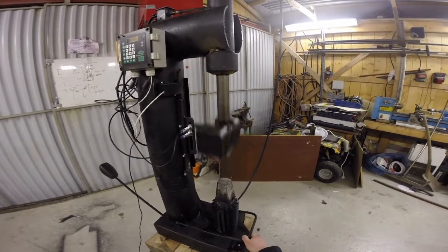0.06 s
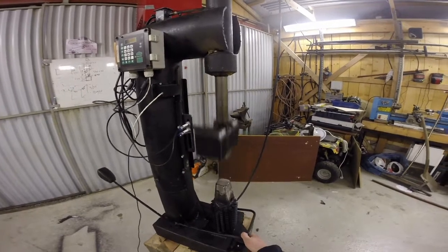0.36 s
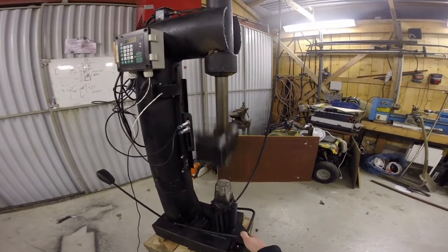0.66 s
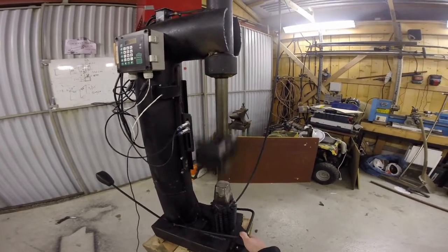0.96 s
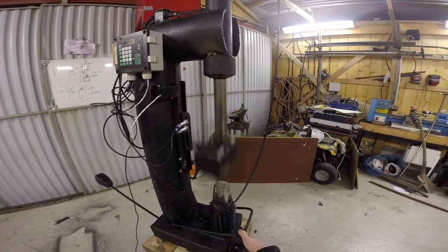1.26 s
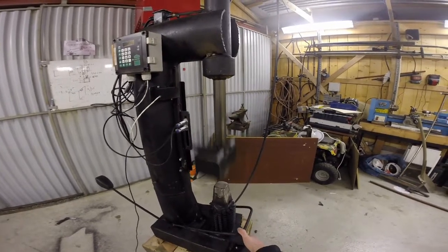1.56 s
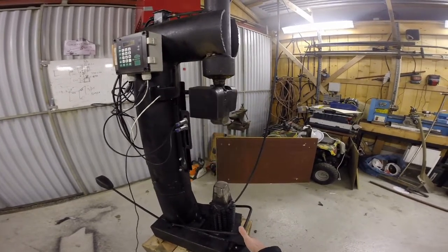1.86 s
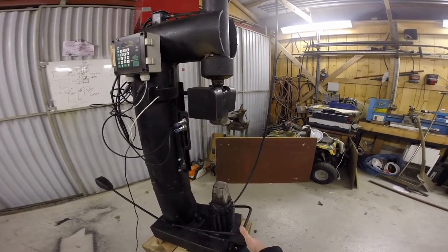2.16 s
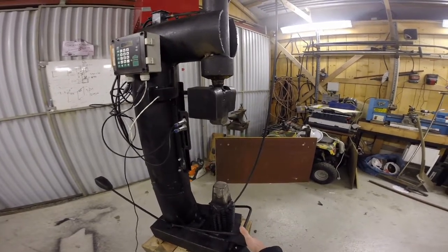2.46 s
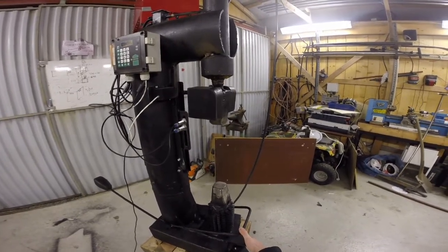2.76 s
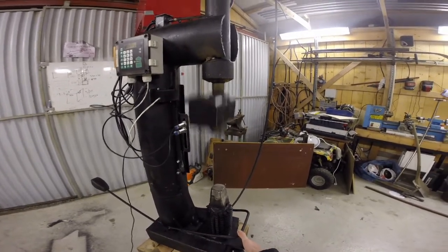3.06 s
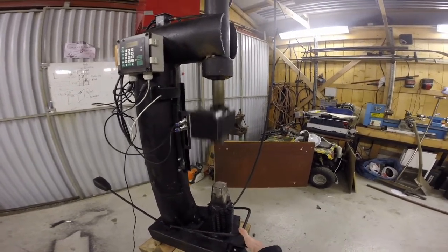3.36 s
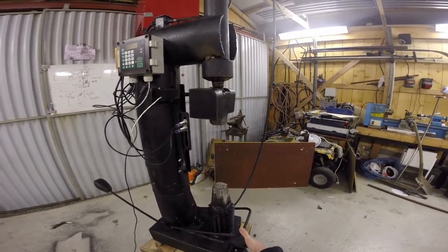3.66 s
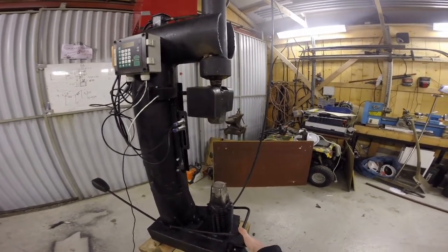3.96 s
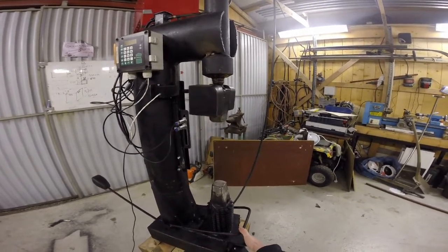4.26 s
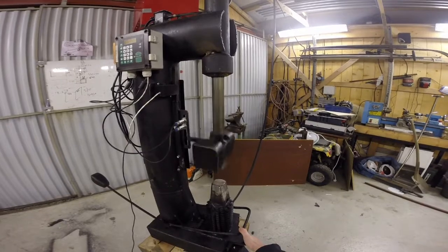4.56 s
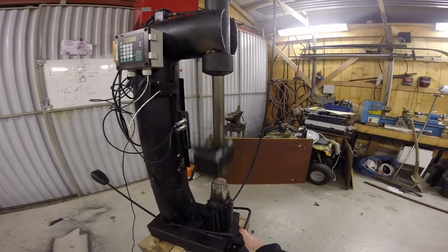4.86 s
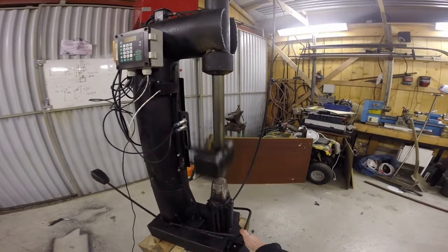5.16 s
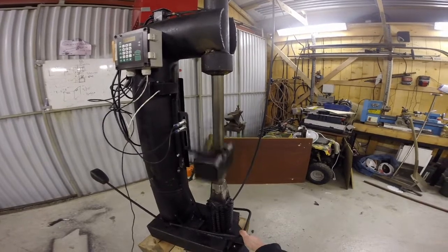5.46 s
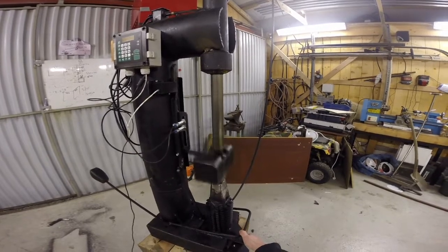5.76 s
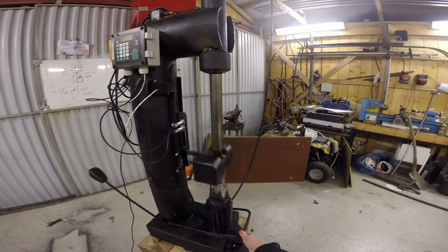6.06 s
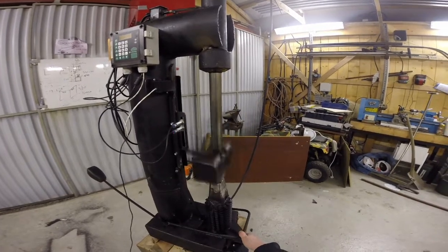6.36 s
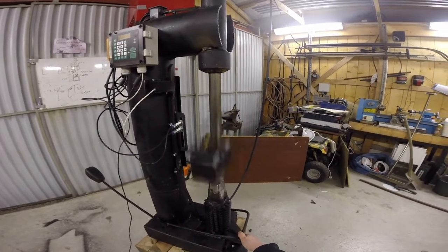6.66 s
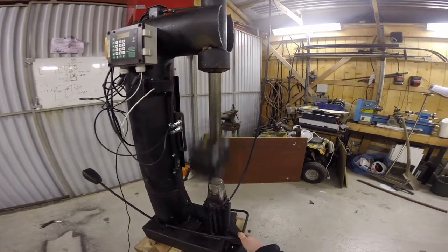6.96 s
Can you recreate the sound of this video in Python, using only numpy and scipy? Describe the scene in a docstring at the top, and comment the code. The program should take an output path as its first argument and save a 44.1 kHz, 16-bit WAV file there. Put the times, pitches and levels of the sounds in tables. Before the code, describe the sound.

Close up in a workshop, an air-powered hammer strikes its anvil twice and keeps cycling with rhythmic blasts of compressed air. It stops with a metal clack and a bleeding hose, makes a single stroke, and stops again, leaving a thin valve whistle and faint ticking from a far pump. It then restarts with a clunk, hissing steadily in pulses, and finishes with sharp steel-on-steel hits.

```python
"""A metal-clad workshop, one microphone on a home-built pneumatic hammer, about three strokes a second.
Exhaust air hisses on every stroke; the ram turns on an air cushion, strikes the anvil or parks against
its top stop, where the hose bleeds and the valve whistles. From across the shop a pump ticks faintly.
The gain control behind the microphone ducks at each blow and swells in the pauses."""
import sys
import numpy as np
from scipy import signal
from scipy.fft import rfft, irfft
from scipy.io import wavfile
from scipy.ndimage import uniform_filter1d, minimum_filter1d

SR = 44100
rng = np.random.default_rng(int(sys.argv[2]) if len(sys.argv) > 2 else 0)


def materialize(psi):
    """Save the field psi as 16-bit PCM at rate SR to the path in sys.argv[1].

    A 1-D psi becomes a single channel; in a 2-D psi each row is a channel.
    """
    bounded = np.clip(np.atleast_2d(psi).T, -1, 1)
    quanta = np.round(bounded * 32767).astype(np.int16)
    wavfile.write(sys.argv[1], SR, quanta)


N = 317961
TIME = np.arange(N) / SR

# Ram on anvil, then ram on top stop. Each row: time in seconds, relative level in dB, extra ring in dB.
ANVIL_BLOWS = [(-.02, 13.5, -6), (0.2946, 17, -9.5), (6.154, -2, -10), (6.157, -3.5, 6.5), (6.169, -3, -1),
               (6.174, -2.5, -18), (6.4551, 18.5, -12), (6.7677, 18, -9), (7.0821, 15, -6)]
TOP_STOPS = [(1.902, 12.5, -3.5), (3.5644, 13.5, -4)]
# The ram turns on its air cushion. Each row: time in seconds, relative level in dB.
RAM_REVERSALS = [(0.81, -25), (1.126, -26.5), (1.447, -24.5), (4.765, -30), (5.067, -29), (5.372, -27.5),
                 (5.684, -28), (5.992, -29), (6.157, -19.5), (6.305, -27)]
# Low shudders of the frame. Each row: start in seconds, relative level in dB.
FRAME_SHUDDERS = [(.65, -29), (1.02, -32), (1.29, -37), (5.2, -36), (5.56, -33.5)]
# The valve launches the parked ram. Each row: start in seconds, relative level in dB, t60 in seconds.
LAUNCHES = [(3.078, -12.5, 0.094), (4.418, -18, 0.1)]
# The valve switches and vents a stroke. Each row: time in seconds, relative flow in dB,
# swell beforehand in seconds, hold in seconds, extra treble in dB.
VALVE_STROKES = [(0.193, -19, 0.06, .11, -4), (0.524, -15.5, 0.067, 0.09, -4),
                 (0.809, -11, 0.17, 0.079, -3.5), (1.129, -12.5, 0.19, 0.093, -4),
                 (1.455, -12.5, .16, 0.1, -4), (1.764, -10.5, .12, 0.11, -8),
                 (3.081, -10, 0.0017, .16, -1.5), (3.429, -14, 0.12, 0.15, 0),
                 (4.425, -10, 0.0023, 0.16, -1.5), (4.773, -13, 0.11, .09, -3),
                 (5.075, -13.5, 0.26, 0.091, -2), (5.379, -13, 0.14, 0.11, -3.5),
                 (5.68, -12.5, 0.15, 0.12, -3), (6.011, -11.5, 0.15, 0.092, -4),
                 (6.337, -7.5, 0.1, 0.07, -3.5), (6.661, -13.5, 0.084, 0.081, -1),
                 (6.968, -11.5, 0.082, 0.086, 0), (7.24, -17.5, 0.11, .1, 2)]
# The valve shuts as the ram ends its travel. Each entry: time in seconds.
VALVE_SHUTS_S = [0.298, 1.902, 3.56, 6.437, 6.772, 7.085]
# Whistles of the valve. Each row: end of the swell in seconds, relative level in dB, length in seconds.
VALVE_WHISTLES = [(2.25, -41.5, .42), (3.87, -39.5, .53)]
# Runs of the pump. Each row: start, end and period in seconds, relative level in dB,
# sag in dB per second, after-click in dB against its tick.
DISTANT_PUMP_RUNS = [(2.558, 3.03, .1053, -29, 12, -6), (3.872, 4.36, .1088, -25, 17, -18)]

# Ringing metal. Each row: frequency in Hz, relative level in dB, t60 (time to fall 60 dB) in seconds.
DIE_AND_FRAME_MODES = [(685, -8.5, 0.014), (938, -5.5, 0.014), (1345, -3, 0.0077), (1794, -4.5, 0.0097),
                       (2290, -8.5, 0.0072), (3100, -27, 0.0045), (4480, -17, 0.019), (888, -30, .4),
                       (895, -30, .4), (1253, -32, 0.51), (1262, -40, 0.3), (1710, -32, 0.34),
                       (1850, -35, 0.69), (2008, -34, 0.31), (2320, -36, .55), (2520, -35, 0.37),
                       (4400, -42, 0.28)]
TOP_STOP_MODES = [(396, -19.5, 0.011), (690, -14, 0.0093), (998, -8, 0.012), (1580, -0.5, 0.011),
                  (2270, -3, 0.0049), (2970, -8, 0.0085), (3530, -5, 0.0049), (1225, -76, .35),
                  (2380, -46, .6), (2395, -42.5, 0.87)]
CASING_MODES = [(860, -10, 0.031), (1003, -7.5, 0.034), (1240, -8, 0.04)]
VALVE_BODY_MODES = [(141, -10.5, 0.11), (332, -3, 0.086), (560, -4, 0.081)]
# Steady narrow peaks that colour the exhaust hiss, then resonances of the bleeding hose.
# Each row: frequency in Hz, width in Hz, gain in dB.
HISS_PEAKS = [(1884, 46, -22), (2500, 16, -20), (2750, 17, -11), (3370, 63, -5.5), (3570, 14, 1.5),
              (3700, 16, -10), (3800, 41, -21), (4220, 45, -7), (5208, 45, -5), (5680, 170, -12),
              (7090, 72, -5.5), (7580, 120, -5.5)]
HOSE_RESONANCES = [(1270, 53, -3), (1700, 79, -37), (2420, 26, -7), (2920, 160, -2), (3400, 40, 7),
                   (4040, 40, 4), (8500, 200, -6)]
# Noise spectra of the sources. Each row: frequency in Hz, relative spectral density in dB.
THUMP_SPECTRUM = [(30, -23), (90, -6), (140, -10.5), (180, -4.5), (250, -9), (450, -2), (900, -28)]
SHUDDER_SPECTRUM = [(25, -7), (55, -9), (90, -1), (130, -7), (250, -42)]
FEED_SPECTRUM = [(15, -35), (25, 2), (156, -5), (219, -5), (249, -16.5), (283, -4.5), (440, -5.5),
                 (839, -3.5), (979, -2), (1140, -7), (1240, -2.5), (2130, -4), (3050, -4), (8580, -31),
                 (12000, -55), (15600, -91), (22000, -120)]
PUFF_SPECTRUM = [(30, -1), (80, -24), (140, 2), (220, -3.5), (340, -3), (560, 7), (900, -7), (2000, -18)]
SHOP_SPECTRUM = [(15, -26), (25, 0.5), (281, -3), (389, -8), (631, -0.5), (919, -3), (1140, 0), (1380, -4),
                 (1660, -1), (2560, -3), (2920, -7.5), (3930, -7.5), (6550, -20), (15500, -36.5)]
EXHAUST_SPECTRUM = [(150, -53), (250, -23), (330, -25), (405, -25), (466, -17), (837, -14.5), (1290, -8.5),
                    (1480, -9), (1790, -5), (4320, 0), (9070, -10), (14700, -29), (15500, -39)]
TICK_SPECTRUM = [(400, -14), (750, -5), (1000, 4), (1250, -3), (1550, -13), (2000, -1), (2800, -29),
                 (6000, -62)]


def from_db(db):
    """Decibels to gain."""
    return 10 ** (np.asarray(db) / 20)


def rms_one(x):
    """Scale to rms 1."""
    return x / np.sqrt(np.mean(x ** 2) + 1e-20)


def since(s):
    """Seconds gone by since time s; zero before it."""
    return np.maximum(TIME - s, 0)


def until(s):
    """Seconds left until time s; zero after it."""
    return np.maximum(s - TIME, 0)


def butter(x, hz, kind):
    """Second-order low- or high-pass filter."""
    return signal.sosfilt(signal.butter(2, hz, kind, fs=SR, output="sos"), x)


def noise(spectrum):
    """Noise of rms 1 with the given spectrum, falling 20 dB an octave beyond its ends."""
    hz, db = np.transpose(spectrum)
    bins = np.maximum(np.fft.rfftfreq(2 * N, 1 / SR), 1)
    octaves_beyond = np.abs(np.log2(bins / np.clip(bins, hz[0], hz[-1])))
    gain = from_db(np.interp(np.log(bins), np.log(hz), db) - 20 * octaves_beyond)
    return rms_one(irfft(rfft(rng.standard_normal(2 * N)) * gain)[:N])


def flutter(hz):
    """Random wavering up to the given rate; rms 1."""
    return rms_one(butter(rng.standard_normal(N + SR), hz, "low")[SR:])


def with_peaks(x, peaks):
    """Add narrow spectral peaks to a noise; rms 1."""
    out = x.copy()
    for hz, width_hz, db in peaks:
        radius = np.exp(-np.pi * width_hz / SR)
        forward = np.array([1, 0, -1]) * (1 - radius ** 2) / 2
        feedback = [1, -2 * radius * np.cos(2 * np.pi * hz / SR), radius ** 2]
        out += from_db(db) * signal.lfilter(forward, feedback, x)
    return rms_one(out)


def dying(t60, attack_s):
    """Envelope that rises softly and falls 60 dB in t60 seconds."""
    return (1 - np.exp(-TIME / attack_s)) ** 2 * np.exp(-np.minimum(np.log(1000) * TIME / t60, 50))


def ring(hz, db, t60, attack_s):
    """One mode of a knocked part: a dying sine."""
    return from_db(db) * np.sin(2 * np.pi * hz * TIME) * dying(t60, attack_s)


def add(out, s, sound):
    """Mix a sound in from time s on."""
    at = round(s * SR)
    part = sound[max(-at, 0):N - at]
    out[max(at, 0):max(at, 0) + len(part)] += part


def repeat(sound, events):
    """Place a sound or envelope at each event, given as time in seconds and level in dB."""
    out = np.zeros(N)
    for s, db, *_ in events:
        add(out, s, from_db(db) * sound)
    return out


def strikes(blows, modes, contact_s, low_cut_hz, crack_db=-2, crack_t60=0.012):
    """Steel on steel: each blow rings every mode with a strength of its own, and the faces crack."""
    out = np.zeros(N)
    rings = np.array([(-1) ** k * ring(*mode, contact_s) for k, mode in enumerate(modes)])
    lasting = np.array([t60 > 0.1 for hz, db, t60 in modes])
    crack = from_db(crack_db) * dying(crack_t60, contact_s) * butter(rng.standard_normal(N), 3100, "low")
    for s, db, ring_db in blows:
        strengths = from_db(rng.standard_normal(len(modes)) + ring_db * lasting)
        add(out, s, from_db(db) * (strengths @ rings + crack))
    return butter(out, low_cut_hz, "high")   # compact steel parts radiate little bass


def anvil():
    """The dies meet in a dead clack; the frame rings on, its close modes beating."""
    return strikes(ANVIL_BLOWS, DIE_AND_FRAME_MODES, contact_s=0.00038, low_cut_hz=465)


def frame(jolt_db=-42, attack_s=0.0034):
    """The column is jolted by each blow, thumps softly at each reversal and shudders as the ram runs."""
    jolts = [(s, db + jolt_db) for s, db, _ in [*ANVIL_BLOWS, *TOP_STOPS]]
    thumps = repeat(dying(0.13, attack_s), [*RAM_REVERSALS, *jolts]) * noise(THUMP_SPECTRUM)
    bending = repeat(ring(hz=140, db=2.5, t60=0.093, attack_s=attack_s), RAM_REVERSALS)   # lowest mode
    shudders = repeat(dying(t60=0.4, attack_s=0.016), FRAME_SHUDDERS) * noise(SHUDDER_SPECTRUM)
    return thumps + bending + shudders


def after_blow_rush(level_db=-20.5, fall_db_per_s=32.5):
    """A dull rush lingers and fades after each full blow, none after grazes."""
    fades = [(TIME >= s) * from_db(level_db - fall_db_per_s * since(s))
             for s, db, _ in ANVIL_BLOWS if db > 0]
    return np.max(fades, axis=0) * butter(noise(FEED_SPECTRUM), 80, "high")


def cylinder(feed_db=-38, chuff_delay_s=0.104, chuff_db=-27):
    """Feed air and the after-blow rush sound while the ram runs; a low puff marks each launch."""
    starts = [0] + [s for s, *_ in LAUNCHES]
    ends = [s for s, *_ in TOP_STOPS] + [N / SR]
    running = sum((TIME >= start) & (TIME < end) for start, end in zip(starts, ends))
    rush = from_db(feed_db) * noise(FEED_SPECTRUM) + after_blow_rush()
    # the valve switches back with a small chuff after each reversal
    chuffs = [(s + chuff_delay_s, chuff_db) for s, _ in RAM_REVERSALS]
    puffs = repeat(dying(t60=0.14, attack_s=0.0042), chuffs)
    for s, db, t60 in LAUNCHES:
        add(puffs, s, from_db(db) * dying(t60, attack_s=0.00043))
    return running * rush + puffs * noise(PUFF_SPECTRUM)


def wall_reflections(x, level_db=-12, wall_hz=3000):
    """Dense, dull reflections reach the microphone from the cluttered walls."""
    tail = rng.standard_normal(N) * dying(t60=0.26, attack_s=0.00038)
    tail = butter(tail / np.sqrt(np.sum(tail ** 2)), wall_hz, "low")
    return from_db(level_db) * signal.fftconvolve(x, tail)[:N]


def room_tone(level_db=-45):
    """The steady hiss of the shop around the microphone."""
    return from_db(level_db) * noise(SHOP_SPECTRUM)


def air_flow(swell_db=10, kick_db=2, kick_s=0.038, spent_db_per_s=65, shut_db_per_s=900,
             treble_swing=1.5, before_switch_db=-1.5):
    """Body and treble gains of the exhaust: a stroke swells, kicks, holds, and runs out or is shut off."""
    body_power, treble_power = np.zeros(N), np.zeros(N)
    for s, db, swell_s, hold_s, bright_db in VALVE_STROKES:
        switched = TIME >= s
        kick = switched * np.exp(-np.minimum(since(s) / kick_s, 20))   # stored pressure escapes first
        shape_db = kick_db * kick - swell_db * until(s) / swell_s - spent_db_per_s * since(s + hold_s)
        # no air vents before the ram is launched or after the valve shuts
        launch_s = max([at for at, *_ in LAUNCHES if at < s - swell_s], default=0)
        shut_s = min([at for at in VALVE_SHUTS_S if at > s], default=TIME[-1])
        shape_db = np.maximum(shape_db - shut_db_per_s * (until(launch_s) + since(shut_s)), -120)
        treble_db = bright_db + treble_swing * shape_db + before_switch_db * ~switched
        body_power += from_db(db + shape_db) ** 2
        treble_power += from_db(db + treble_db) ** 2
    return np.sqrt(body_power), np.sqrt(treble_power)


def exhaust(split_hz=10500, treble_lift_db=2.0, rough_db=0.66, surge_db=0.56):
    """A turbulent jet with steady narrow peaks; its top treble swells and fades faster than its body."""
    body_gain, treble_gain = air_flow()
    jet = with_peaks(noise(EXHAUST_SPECTRUM), HISS_PEAKS)
    # two-way split whose halves sum flat
    body = butter(butter(jet, split_hz, "low"), split_hz, "low")
    treble = butter(butter(jet, split_hz, "high"), split_hz, "high")
    turbulence_db = rough_db * flutter(hz=350) + surge_db * flutter(hz=30)
    return (body_gain * body + from_db(treble_lift_db) * treble_gain * treble) * from_db(turbulence_db)


def top_stop():
    """The ram parks against its top stop with a clack and a thin, lasting ring."""
    return strikes(TOP_STOPS, TOP_STOP_MODES, contact_s=0.00061, low_cut_hz=253)


def hose_bleed(level_db=-30, hold_s=0.27, fall_db_per_s=125):
    """Air runs on through the ringing hose after the ram parks, until the pressure evens out."""
    flow = sum((TIME >= s) * from_db(level_db - fall_db_per_s * since(s + hold_s)) for s, *_ in TOP_STOPS)
    return flow * with_peaks(noise(FEED_SPECTRUM), HOSE_RESONANCES)


def ticks(events, rasp_db=-5, attack_s=0.00085):
    """Light knocks of the settling ram or the pump: a short rasp and a ringing casing."""
    rasp = from_db(rasp_db) * repeat(dying(0.097, attack_s), events) * noise(TICK_SPECTRUM)
    casing = sum(ring(*mode, attack_s) for mode in CASING_MODES)
    return rasp + repeat(casing, events)


def valve_whistle(hz=759, swell_db_per_s=240, sag_db_per_s=25, end_db_per_s=300):
    """A thin note from the nearly closed valve: its level swells, sags with the pressure and dies."""
    level = np.zeros(N)
    for s, db, length_s in VALVE_WHISTLES:
        drop_db = swell_db_per_s * until(s) + sag_db_per_s * since(s) + end_db_per_s * since(s + length_s)
        level += from_db(db - drop_db)
    return level * np.sqrt(2) * np.sin(2 * np.pi * hz * TIME)


def pump_strokes(after_click_s=0.0317):
    """Times and levels of the pump across the shop: even, fading ticks, each with an after-click."""
    events = []
    for start, end, period, db, sag_db_per_s, after_db in DISTANT_PUMP_RUNS:
        for s in np.arange(start, end, period):
            tick_db = db - sag_db_per_s * (s - start)
            events += [(s, tick_db), (s + after_click_s, tick_db + after_db)]
    return events


def valve_clunk():
    """The first rush of air knocks the valve body at each launch."""
    body = sum(ring(*mode, attack_s=0.0007) for mode in VALVE_BODY_MODES)
    return repeat(body, LAUNCHES)


def scene(exhaust_db=1.0, steel_db=2.0, settle_s=2.191, settle_db=-20):
    """Hammer, walls, pump and room tone at the microphone, the same in both channels."""
    steel = from_db(steel_db) * (anvil() + top_stop())
    air = from_db(exhaust_db) * exhaust() + cylinder() + hose_bleed() + valve_whistle()
    hammer = steel + air + valve_clunk() + frame()
    tick_events = [(settle_s, settle_db)] + pump_strokes()   # the parked ram settles with one tick
    mono = hammer + wall_reflections(hammer) + ticks(tick_events) + room_tone()
    return np.array([mono, mono])


def gain_control(x, target_db=-12.0, start_db=-11.5, window_s=0.02, ahead_s=0.00093,
                 hold_s=0.14, release_db_per_s=15.5):
    """Looks a little ahead, turns down at once, holds, then creeps back up."""
    power = uniform_filter1d(x.mean(axis=0) ** 2, int(window_s * SR))
    level_db = 10 * np.log10(np.maximum(power, 1e-10))
    wanted_db = target_db - np.interp(TIME + ahead_s, TIME, level_db)
    wanted_db[0] = start_db   # still turned down by earlier blows
    half_hold = int(hold_s * SR / 2)
    held_db = minimum_filter1d(wanted_db, 2 * half_hold + 1, origin=half_hold, mode="nearest")
    creep_db = release_db_per_s * TIME
    gain_db = np.minimum.accumulate(held_db - creep_db) + creep_db
    return x * from_db(uniform_filter1d(gain_db, size=64))


def record(dry, cutoff_hz=15400):
    """Behind the microphone: gain control, overload on the blows and a steep cut of the top treble."""
    clipped = np.clip(gain_control(dry), -1, 1)
    return signal.sosfilt(signal.ellip(10, .1, 80, cutoff_hz, fs=SR, output="sos"), clipped)


dry = scene()
out = record(dry)
materialize(out)
```